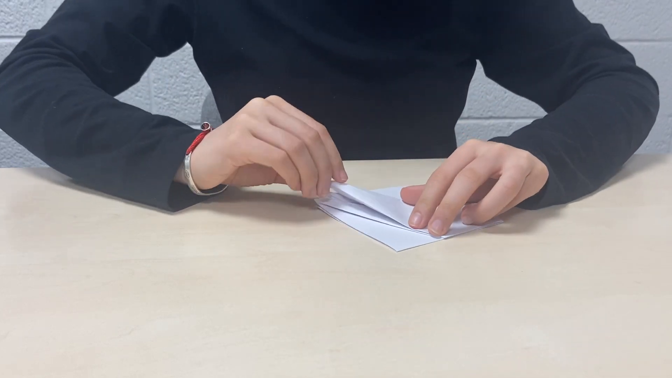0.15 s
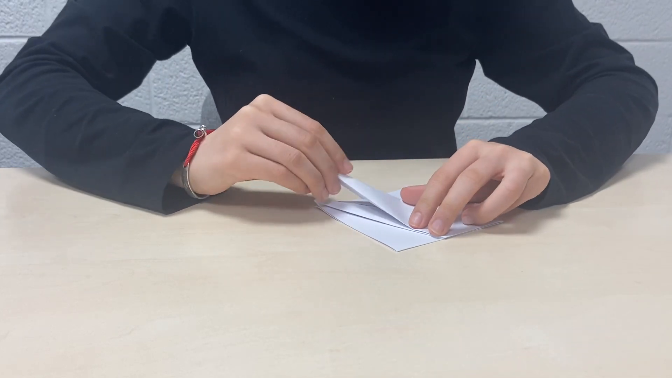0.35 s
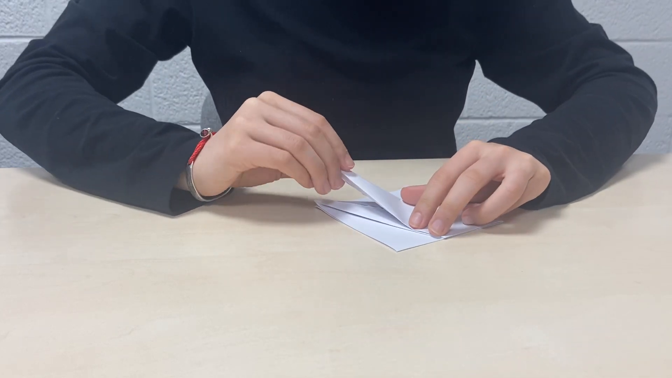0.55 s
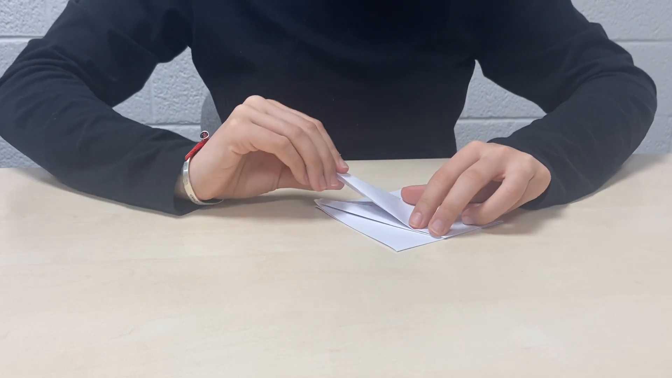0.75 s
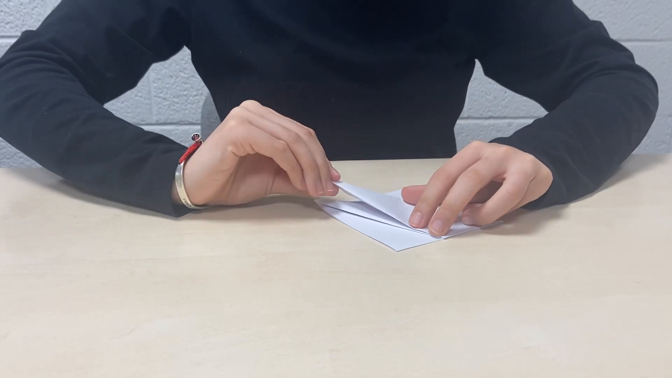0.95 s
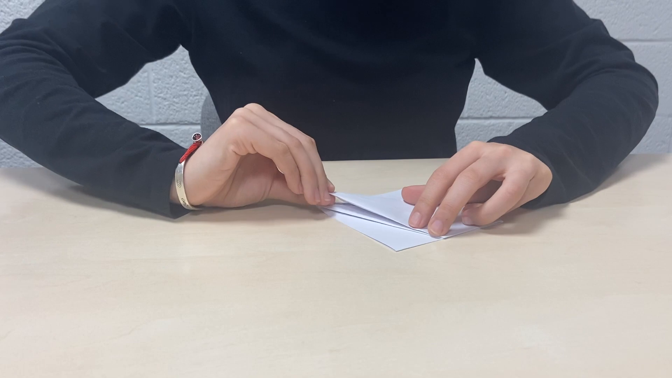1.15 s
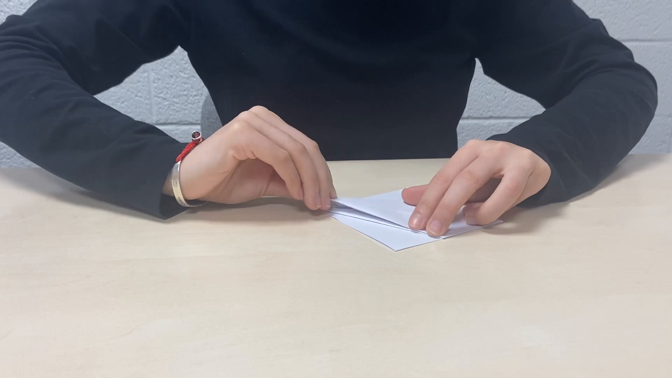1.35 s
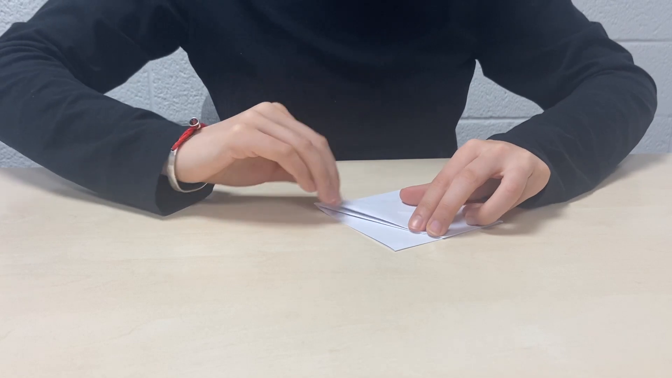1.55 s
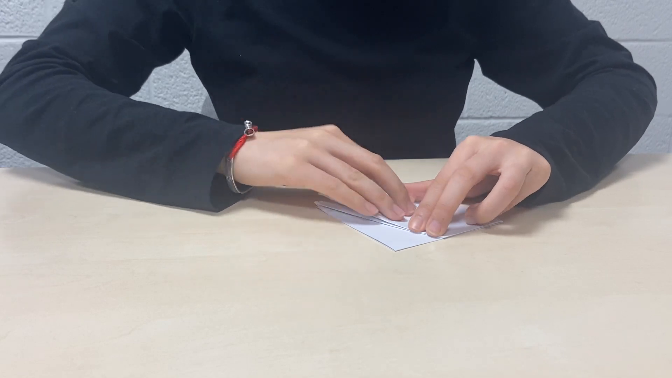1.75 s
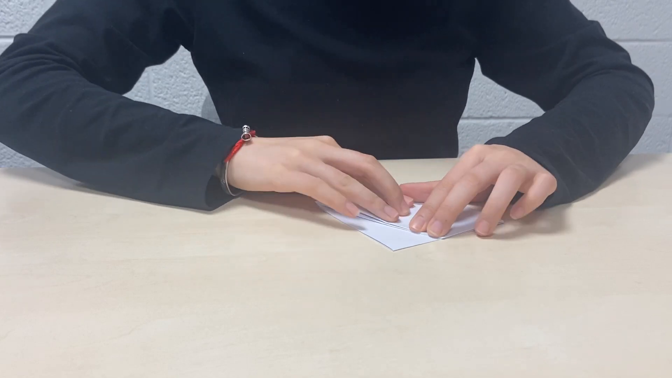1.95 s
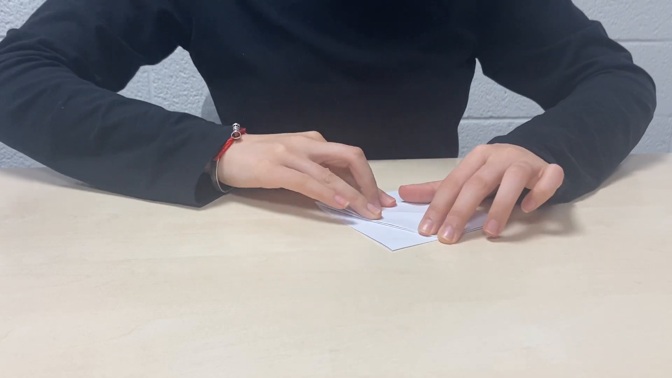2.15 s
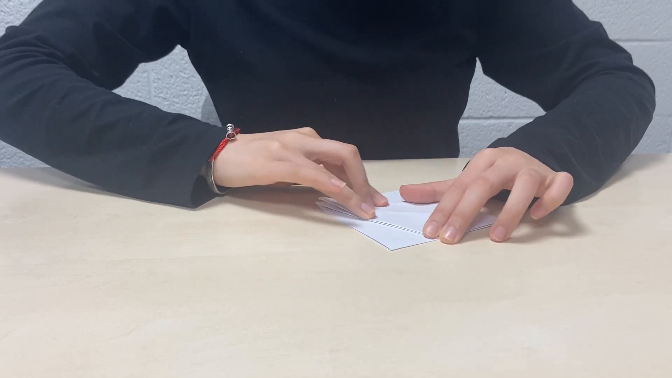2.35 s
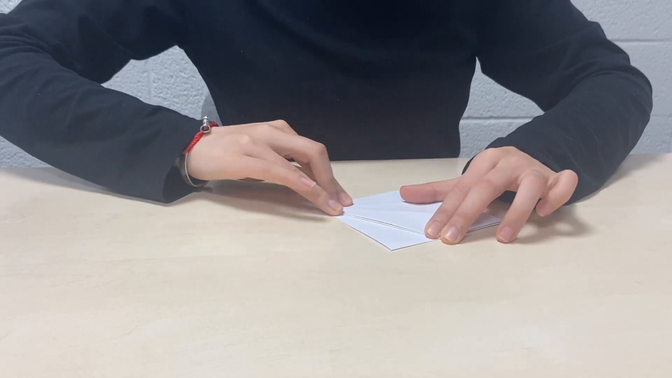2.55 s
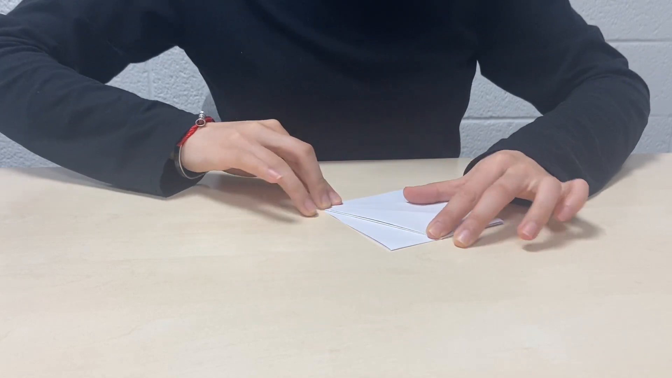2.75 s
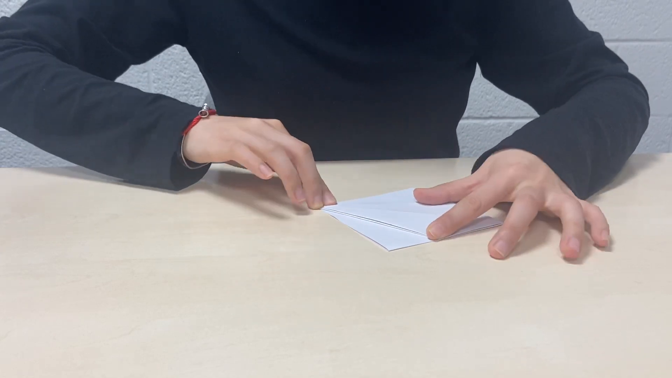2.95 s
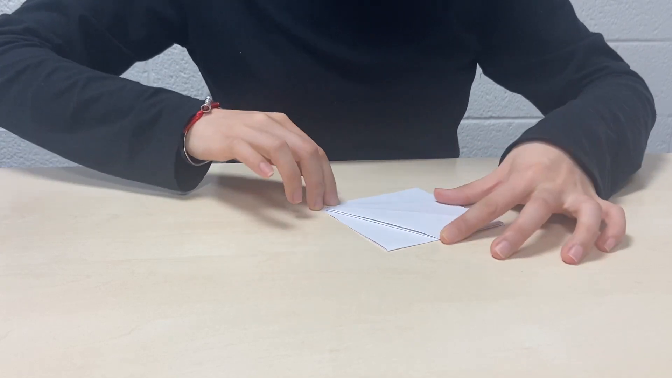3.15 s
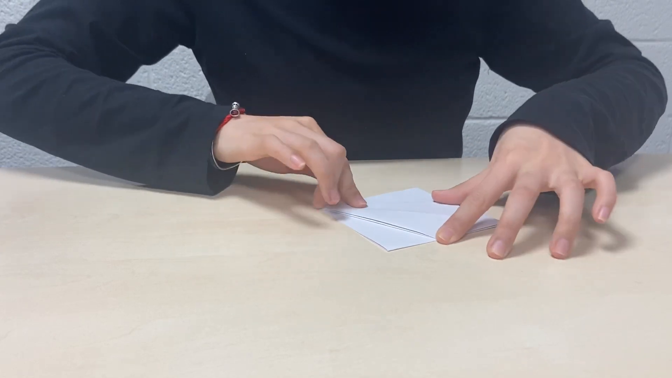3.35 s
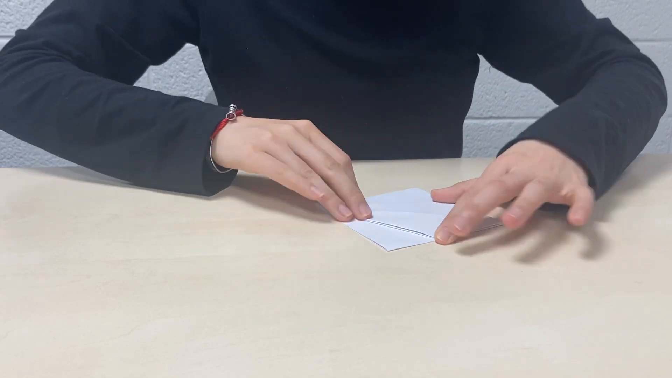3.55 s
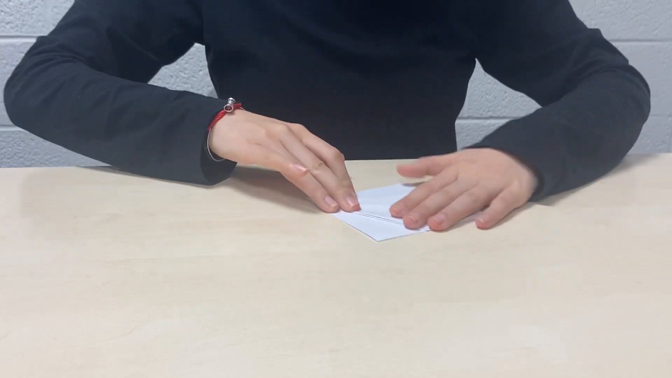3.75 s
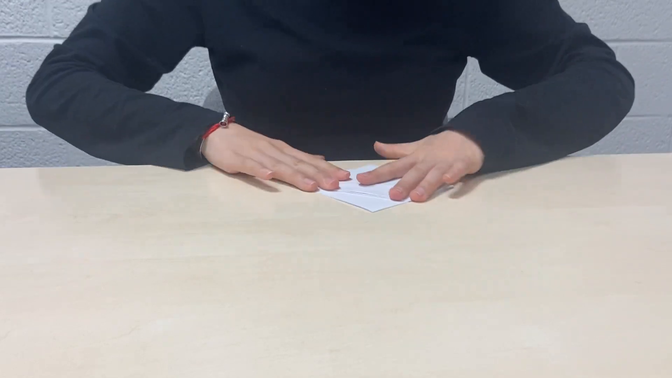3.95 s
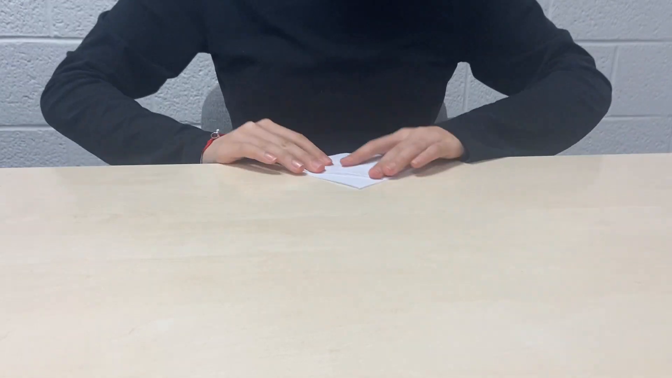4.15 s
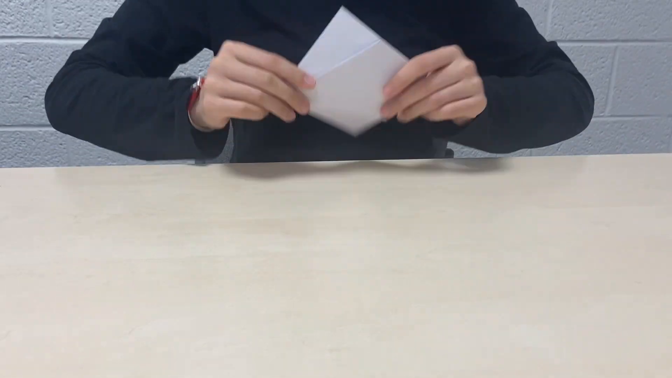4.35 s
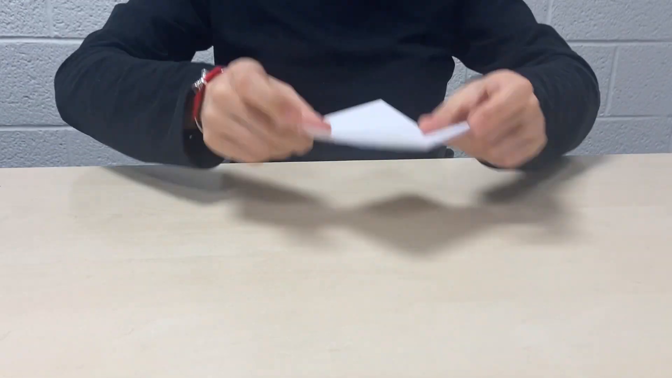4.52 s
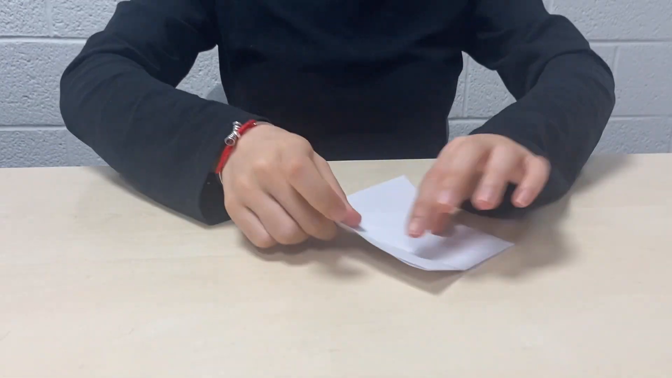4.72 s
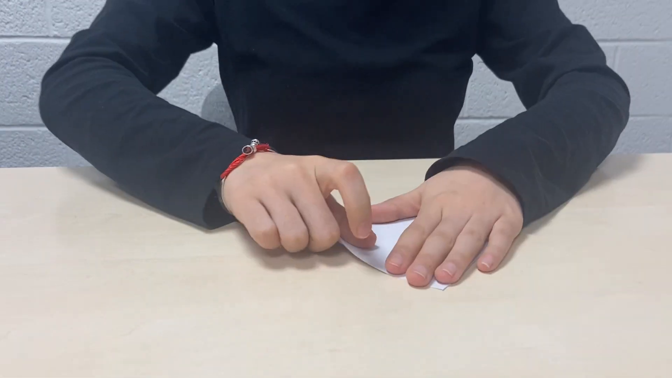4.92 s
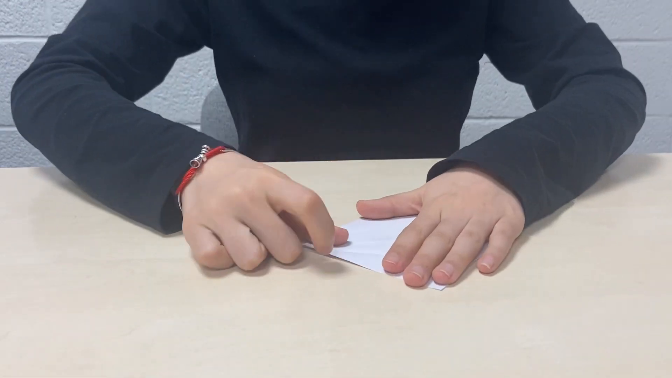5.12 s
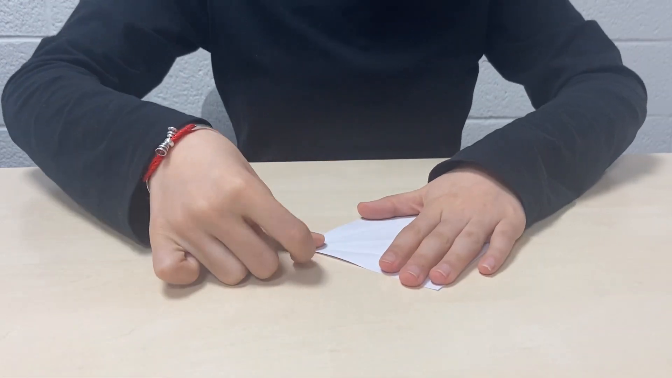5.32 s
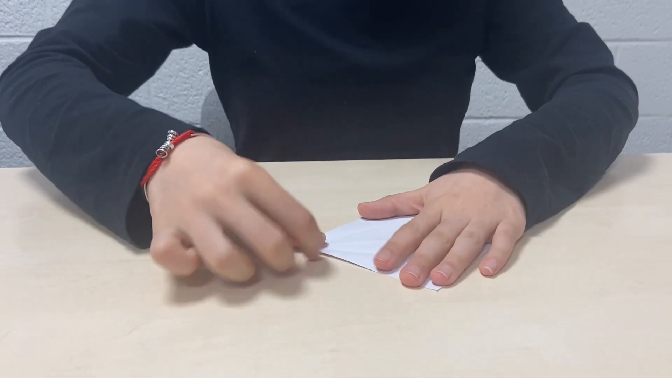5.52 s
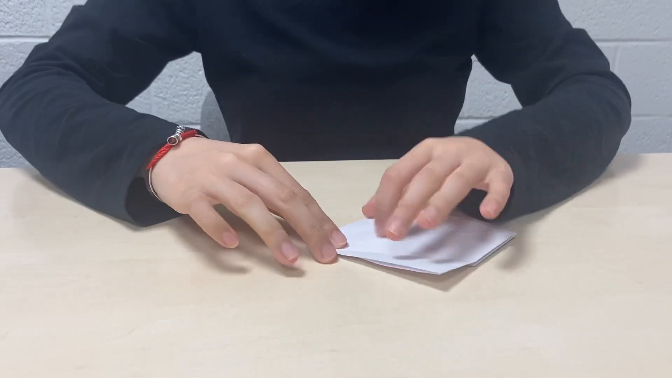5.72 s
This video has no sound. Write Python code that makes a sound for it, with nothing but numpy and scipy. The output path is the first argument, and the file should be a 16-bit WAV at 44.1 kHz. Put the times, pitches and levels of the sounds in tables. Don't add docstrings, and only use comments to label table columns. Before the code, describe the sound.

Close paper folding in a hard-walled room: crackling creases, hissing finger strokes, a brisk turn of the sheet, and dull palm thumps on the tabletop.

```python
import sys
import numpy as np
from scipy import signal
from scipy.fft import rfft, irfft, next_fast_len
from scipy.io import wavfile

SR = 44100
rng = np.random.default_rng(int(sys.argv[2]) if len(sys.argv) > 2 else 0)


def nominal_scale(level):
    x = np.asarray(level, float) / 20
    return 10 ** x


def dump_mix(stems):
    frames = np.atleast_2d(stems).T
    limited = np.clip(frames, -1, 1)
    pcm = np.round(limited * 32767).astype(np.int16)
    wavfile.write(sys.argv[1], SR, pcm)


N = 259300
SIZE = next_fast_len(N + SR)
HZ = np.maximum(np.arange(SIZE // 2 + 1) * SR / SIZE, 1)


def at_hz(points, hz):
    return np.interp(np.log(hz), np.log(np.array(points)[:, 0]), np.array(points)[:, 1])


def in_time(rows):
    s, value = np.transpose(rows)
    return np.interp(np.arange(N) / SR, s, value)


def rms_one(x):
    return x / np.sqrt(np.mean(x ** 2) + 1e-20)


def drift(rate):
    r = np.exp(-2 * np.pi * rate / SR)
    wander = signal.lfilter([1], [1, -2 * r, r * r], rng.standard_normal(N + SR))
    return rms_one(wander[SR:])


def colour(x, spectrum):
    return rms_one(irfft(rfft(x, SIZE) * nominal_scale(at_hz(spectrum, HZ)), SIZE)[:, :N])


def ring(x, hz, width_hz):
    r = np.exp(-np.pi * width_hz / SR)
    poles = [1, -2 * r * np.cos(2 * np.pi * hz / SR), r * r]
    return signal.lfilter(np.array([1, 0, -1]) * (1 - r * r) / 2, poles, x)


def background():
    # time in seconds, level in dB.
    rumble_level = [(0.0, -58.5), (1.46, -59), (1.75, -58.5), (1.98, -57), (2.11, -58.5), (3.27, -56.5),
                    (3.5, -55.5), (3.96, -54), (4.14, -53.5), (4.29, -57.5), (4.42, -52.5), (4.7, -59.5),
                    (5.04, -53), (5.37, -60), (5.6, -56), (5.88, -55.5)]
    # frequency in Hz, density in dB per Hz.
    air_spectrum = [(18, -51.5), (30, -4), (59, 1.5), (112, 3), (163, -8.5), (213, -5), (275, -14.5),
                    (342, -12.5), (495, -26.5), (640, -24.5), (830, -72), (1410, -120)]
    # frequency in Hz, density in dB per Hz.
    hiss_spectrum = [(600, 3), (1500, -0.5), (3500, -8), (8000, -15.5), (16000, -24)]
    unsteady = nominal_scale(in_time(rumble_level) + 1.44 * drift(24))
    rumble = unsteady * colour(rng.standard_normal((2, N)), air_spectrum)
    hiss = nominal_scale(-84) * colour(rng.standard_normal((2, N)), hiss_spectrum)
    return rumble + hiss


def thumps():
    # time in seconds, peak in dB, tilt in dB per octave.
    hits = [(0.163, -50, 7), (2.425, -41, -2.5), (2.552, -50, 5), (2.88, -48, 5), (3.341, -40.5, -7),
            (3.639, -37.5, -6), (3.987, -28.5, 0.5), (4.202, -45, -16.5), (4.283, -38, 3.5),
            (4.899, -28.5, 0), (4.955, -36.5, 7), (5.703, -34.5, -6)]
    # frequency in Hz, level in dB, t60 in seconds.
    modes = [(59, -3, 0.61), (85.7, -9.5, 0.28), (108.3, -2, 0.28), (126.5, -7.5, 0.81),
             (168.3, -7.5, 0.43), (242.6, -10.5, 0.11)]
    start_s, peak_db, tilt_db = np.transpose(hits)
    at = np.round(start_s * SR).astype(int)
    spread_db = rng.normal(0, 4.2, (len(hits), len(modes)))
    out = np.zeros(N)
    for k, (hz, level_db, t60) in enumerate(modes):
        push = np.full(N, 1e-18)
        tilt = tilt_db * np.log2(hz / 100)
        push[at] = nominal_scale(peak_db + level_db - 8.5 + tilt + spread_db[:, k])
        r, w = nominal_scale(-60 / (t60 * SR)), 2 * np.pi * hz / SR
        mode = signal.lfilter([0, np.sin(w)], [1, -2 * r * np.cos(w), r * r], push)
        out += mode * (-1) ** k
    soft = signal.butter(2, 350, fs=SR, output="sos")
    return signal.sosfilt(soft, out) * [[1], [.2]]


def pocket(rows, rise_s, bend):
    out, t = np.zeros((2, N + SR)), np.arange(SR // 2) / SR
    for s, level_db, first_hz, last_hz, t60, width in rows:
        blur = signal.butter(2, np.clip(width, .02, .3) * last_hz, fs=SR, output="sos")
        sway = signal.sosfilt(blur, rng.standard_normal((2, 2, len(t))))
        glide_hz = last_hz + (first_hz - last_hz) * np.exp(-t / 0.057)
        phase = 2 * np.pi * np.cumsum(glide_hz) / SR
        note = rms_one(sway[0] * np.cos(phase) + sway[1] * np.sin(phase))
        at = round(s * SR)
        fade = nominal_scale(level_db - 60 * (t / t60) ** bend)
        out[:, at:at + len(t)] += note * fade * np.clip(t / rise_s, 0, 1)
    return out[:, :N]


def rubbed_pocket():
    # start in seconds, level in dB, first Hz, last Hz, t60 in seconds, width as share of the note.
    hums = [(.18, -67.5, 3020, 2720, 0.24, 0.11), (.58, -69, 2900, 2890, 0.15, 0.088),
            (.81, -65.5, 2040, 1880, 0.33, 0.075), (.84, -73, 3440, 3460, 0.17, .05),
            (.87, -63, 658, 616, 0.24, .1), (1.29, -68, 2100, 1940, 0.28, .1),
            (1.77, -62, 6120, 6250, 0.19, 0.11), (2.79, -63, 841, 845, 0.44, 0.12),
            (2.8, -71, 1786, 2106, 0.44, 0.2), (4.405, -59, 7600, 6420, .4, 0.13),
            (4.892, -56, 1758, 1600, 0.11, .1), (4.9, -52.5, 5250, 4930, 0.12, 0.14),
            (5.26, -68, 787, 804, .24, 0.28)]
    return pocket(hums, rise_s=.015, bend=2)


def flicked_pocket():
    # start in seconds, level in dB, first Hz, last Hz, t60 in seconds, width as share of the note.
    flicks = [(0.33, -60, 1443, 1376, 0.34, 0.071), (.33, -45.5, 3470, 3500, 0.08, .1),
              (.778, -57, 2464, 2160, 0.33, 0.065), (.778, -63, 4420, 4480, 0.066, 0.11),
              (0.787, -56, 1694, 1630, 0.52, 0.074), (1.049, -72, 1640, 1610, 0.54, 0.1),
              (1.04, -82.5, 3440, 3310, 0.51, 0.041), (1.269, -47.5, 2470, 2140, 0.15, 0.14),
              (2.505, -49, 1738, 1675, 0.37, 0.11), (2.5, -51, 2600, 2520, 0.094, 0.059),
              (4.445, -67, 1896, 1844, 1, 0.15), (4.735, -40.5, 4920, 4700, 0.13, 0.039),
              (5.3, -65, 697, 700, 0.56, 0.052)]
    return pocket(flicks, rise_s=0.00081, bend=0.89)


def friction(spectrum, grains_per_s, grain_db, flutter_db):
    born = rng.random(N) < grains_per_s * nominal_scale(5 * drift(25)) / SR
    slips = rms_one(born * nominal_scale(5.8 * np.minimum(rng.exponential(1, N), 4)))
    flutter = nominal_scale(flutter_db * (drift(14) + drift(60)))
    rough = flutter * (1 + nominal_scale(grain_db) * slips)
    return colour(rough * rng.standard_normal((2, N)), spectrum)


def strokes(s, swell_s, level_db, fade_s):
    t = np.arange(0, N + 32, 32)[:, None] / SR - s
    away = np.maximum(-t / np.maximum(swell_s, .002), t / np.maximum(fade_s, .005))
    below = away ** 1.012
    gain = np.sqrt(np.sum(nominal_scale(level_db - 30 * np.minimum(below, 5)) ** 2, axis=1))
    return np.interp(np.arange(N) / 32, np.arange(len(gain)), gain)


def sliding_speed():
    # fastest moment in seconds, swell in seconds, hiss in dB, fade in seconds.
    fingertips = [(.03, 0.18, -62.5, 0.052), (.168, 0.13, -60, 0.2), (.235, 0.12, -60.5, 0.054),
                  (0.335, 0.0099, -57, 0.025), (.36, .01, -76, 1), (0.583, 0.016, -61, 0.096),
                  (.635, .08, -70.5, 0.043), (.785, 0.0078, -68, 0.073), (.93, 0.085, -70.5, 0.077),
                  (1.151, 0.012, -68, 0.0097), (1.2, 0.1, -72.5, 0.37), (1.272, 0.1, -69, 0.29),
                  (1.414, 0.073, -64.5, 0.18), (1.583, 0.12, -58.5, 0.067), (1.642, 0.052, -60, .08),
                  (1.77, .004, -60.5, 0.34), (1.888, 0.029, -48.5, 0.092), (2.084, 0.061, -54.5, 0.2),
                  (2.364, 0.0031, -62, 0.052), (2.422, 0.032, -55.5, 0.14), (2.546, 0.2, -60.5, 0.26),
                  (2.746, 0.0053, -71, 0.03), (2.853, 0.2, -69.5, 0.11), (2.912, .012, -70, 0.24),
                  (3.06, 0.23, -72.5, 0.11), (3.17, 0.049, -63.5, 0.19), (3.25, 0.031, -59, 0.033),
                  (3.327, 0.0096, -68, 0.021), (3.497, 0.027, -45.5, 0.056), (3.53, .012, -71, 1),
                  (3.695, 0.05, -63.5, 0.038), (4.67, .02, -54, .06), (4.895, 0.029, -58, 0.62),
                  (5.127, 0.22, -58.5, 0.043), (5.146, 0.0066, -54, 0.017), (5.35, 0.45, -69, 0.05),
                  (5.582, 0.051, -67.5, 0.91), (5.708, 0.15, -56, 0.23), (5.88, 0.076, -61, 0.1)]
    # time in seconds, level in dB.
    drag_level = [(3.73, -68), (3.75, -56), (3.95, -53.5), (4.19, -58), (4.36, -56.5), (4.4, -63),
                  (4.5, -59.5), (4.55, -56), (4.575, -69), (4.61, -58), (4.7, -57.5), (4.82, -53),
                  (4.9, -76)]
    t = np.arange(N) / SR
    moving = (t > drag_level[0][0]) & (t < drag_level[-1][0])
    dragging = nominal_scale(in_time(drag_level)) * moving
    return np.hypot(strokes(*np.transpose(fingertips)), dragging)


def rustle():
    # frequency in Hz, density in dB per Hz.
    slide_spectrum = [(500, -31), (1500, -13.5), (3000, 3.5), (5000, 4.5), (7000, 5.5), (10000, 6.5),
                      (13000, 4.5), (15800, 5.5), (16100, -18)]
    flex_spectrum = [(500, -5), (1000, -2), (1300, 2.5), (1800, 0.5), (2500, -1.5), (3500, -3),
                     (6000, -15.5), (12000, -43)]
    press_spectrum = [(150, 0.5), (350, 5), (600, -1), (1000, -10), (1500, -23.5), (4000, -41)]
    # strongest moment in seconds, swell in seconds, flexing in dB, pressing in dB, fade in seconds.
    bends = [(0.045, 0.017, -57.5, -67, 0.15), (.172, 0.38, -63.5, -70, 0.26),
             (.336, 0.011, -53.5, -56.5, 0.12), (.4, .1, -67, -79, 0.21),
             (0.579, 0.016, -60.5, -61, 0.11), (0.781, 0.0085, -57.5, -50.5, 0.15),
             (0.916, 0.2, -70, -61, 0.14), (1.155, 0.009, -81, -71, 0.14),
             (1.276, 0.0099, -57.5, -55.5, 0.12), (1.4, 0.72, -81, -69.5, 0.31),
             (1.583, 0.0067, -55, -70, 0.13), (1.888, 0.17, -56, -63.5, 0.15),
             (2.081, 0.041, -58, -57, 0.14), (2.37, 0.013, -71.5, -57, 0.063),
             (2.411, 0.015, -57, -51.5, 0.18), (2.498, 0.043, -49.5, -50.5, 0.11),
             (2.589, 0.21, -62, -62, 0.16), (2.777, 0.028, -70.5, -50, 0.33),
             (2.911, 0.054, -66.5, -49, 0.15), (3.167, 0.029, -70, -59.5, 0.16),
             (3.323, 0.01, -64.5, -65, 0.087),
             (3.751, 0.059, -55.5, -57.5, 0.2), (3.993, 0.041, -78, -59.5, 0.45),
               (4.291, 0.025, -74, -51, 0.34), (4.36, 0.49, -62, -63, 0.11),
               (4.731, 0.016, -43.5, -45.5, 0.19), (4.907, 0.063, -51.5, -53.5, 0.2),
               (5.146, 0.096, -60, -60, 0.13), (5.34, 0.19, -70, -63, 0.11),
               (5.58, 0.015, -70, -67.5, 0.19), (5.71, 0.077, -54, -62, 0.17),
               (5.88, 0.094, -67, -73, 0.12)]
    s, swell_s, flex_db, press_db, fade_s = np.transpose(bends)
    sliding = sliding_speed()
    bent_by_sliding = nominal_scale(-13.5) * sliding
    flexing = np.hypot(strokes(s, swell_s, flex_db, fade_s), bent_by_sliding)
    pressing = strokes(s, swell_s, press_db, fade_s)
    slide = sliding * friction(slide_spectrum, 900, grain_db=-11, flutter_db=1.5)
    flex = flexing * friction(flex_spectrum, 360, grain_db=-10, flutter_db=2.1)
    press = pressing * friction(press_spectrum, 120, grain_db=-11, flutter_db=1.2)
    return slide + flex + press


def pops():
    # start in seconds, peak in dB, note in Hz, t60 in seconds.
    facet_pops = [(.005, -47.5, 1500, 0.0068), (0.0385, -30, 2870, 0.0098), (0.0387, -34.5, 1640, 0.015),
                  (.038, -39.5, 6700, 0.016), (.172, -46, 3040, .012), (.173, -65, 1500, .012),
                  (0.329, -37.5, 2700, 0.02), (.441, -49.5, 2860, 0.021), (.776, -41, 2170, 0.044),
                  (.776, -45, 2575, 0.11), (0.783, -46, 2400, 0.022), (0.787, -47.5, 484, 0.17),
                  (.864, -51.5, 2460, 0.025), (1.147, -54.5, 1300, 0.016), (1.217, -58, 900, 0.021),
                  (1.31, -56, 4800, 0.013), (1.394, -60, 7040, .012), (1.492, -66, 1600, 0.013),
                  (1.593, -36.5, 2810, 0.012), (1.593, -47, 1040, 0.028), (1.702, -61, 1310, 0.012),
                  (1.794, -49, 2960, 0.0078), (1.803, -47, 1480, 0.0071), (1.83, -45, 3840, .01),
                  (1.863, -50, 2500, 0.004), (1.9, -39.5, 3870, 0.011), (1.913, -61, 1500, .012),
                  (1.931, -48, 3830, .012), (2.103, -55, 1800, .012), (2.207, -65, 1400, 0.013),
                  (2.407, -38, 3120, 0.014), (2.407, -51, 770, 0.035), (2.427, -45, 3370, .01),
                  (2.48, -23.5, 2630, 0.0073), (2.48, -31.5, 3680, 0.0094), (2.4805, -33.5, 1730, 0.04),
                  (2.486, -39, 1340, 0.014), (2.491, -30, 2940, .01), (2.49, -39, 3850, 0.0087),
                  (2.496, -35, 2540, 0.025), (2.496, -35, 1550, 0.014), (2.497, -39, 1020, 0.12),
                  (2.738, -59, 1990, 0.013), (2.785, -50, 840, 0.052), (2.81, -44.5, 617, 0.064),
                  (2.858, -48, 820, 0.049), (2.858, -60, 3100, .012), (2.906, -47, 820, 0.07),
                  (2.913, -62, 2000, 0.018),
                  (3.217, -55, 3020, 0.0084), (3.566, -57.5, 2320, .015), (3.578, -61, 2000, 0.015),
                 (3.617, -53, 7360, 0.0074), (3.774, -33.5, 2400, 0.0093), (3.777, -33.5, 1600, 0.011),
                 (3.856, -42, 2980, 0.0075), (4.315, -48, 2000, .01), (4.322, -39, 1010, 0.02),
                 (4.335, -42, 1180, .01), (4.337, -48, 4600, 0.0087), (4.344, -45, 3160, .01),
                 (4.344, -41, 1820, .01), (4.355, -42, 1710, .01), (4.357, -54, 3400, .008),
                 (4.363, -39.5, 695, 0.014), (4.375, -46, 1100, 0.0083), (4.417, -59, 2100, .012),
                 (4.433, -37, 1970, 0.012), (4.437, -41, 460, 0.026), (4.448, -53.5, 1890, .012),
                 (4.51, -54, 1790, .012), (4.552, -47.5, 1650, 0.017), (4.561, -45.5, 600, 0.0092),
                 (4.721, -52, 3400, .01), (4.7279, -23.5, 3680, 0.0061), (4.7275, -26, 7600, 0.0063),
                 (4.729, -30.5, 2860, 0.014), (4.729, -31.5, 1170, .025), (4.736, -34.5, 2160, .04),
                 (4.898, -41, 1900, .015), (4.902, -38.5, 280, 0.088), (4.905, -32.5, 3230, 0.026),
                 (4.905, -25.5, 4640, 0.0042), (4.908, -40, 1750, 0.04), (5.144, -41, 4800, 0.012),
                 (5.145, -49.5, 3000, .01), (5.144, -54, 6600, 0.0093), (5.707, -39, 4500, 0.01),
                 (5.708, -42, 2490, 0.0075), (5.717, -44, 1390, .012), (5.868, -54, 3800, 0.012),
                 (5.871, -52, 995, 0.014)]
    edge_spits = [
        (0.0368, -40, 11400, .007),
        (.3276, -34.5, 11000, 0.006),
        (.3276, -31, 15200, .006),
        (0.331, -48, 6600, .006),
        (.796, -66, 11100, .006),
        (1.051, -66, 6500, 0.0047),
        (1.146, -64, 12000, 0.009),
        (2.496, -50, 11200, .006),
        (4.898, -50, 11200, .01),
        (4.7268, -32, 14900, .007),
    ]
    out, t = np.zeros((2, N + 4096)), np.arange(4096) / SR
    rise = np.clip(t / 0.00017, 0, 1)
    click = 1 + 1.1 * np.exp(-t / .0004)
    for s, peak_db, hz, t60 in [*facet_pops, *edge_spits]:
        shape = nominal_scale(peak_db - 60 * t / np.maximum(t60, .003)) * rise * click
        phase = 2 * np.pi * hz * t
        at = round(s * SR)
        out[:, at:at + 4096] += shape * [np.sin(phase), 1.03 * np.cos(phase)]
    return out[:, :N]


def buckles():
    # start in seconds, peak in dB, ring in Hz, bright crack in dB, low flap in dB.
    sharp = [(0.0385, -40, 1030, 16, 6.5), (0.0646, -45, 1310, -21, -25), (0.3269, -40.5, 1280, 14.5, 8.5),
             (1.9, -40, 1450, -18.5, -9), (2.407, -47, 796, 20.5, 6.5), (2.427, -43, 1110, -39, -24),
             (2.4845, -31, 1100, -9, -16), (4.319, -57, 970, -22, -22), (4.356, -47, 1670, -26, -30.5),
             (4.721, -46, 2200, 17.5, -15), (4.727, -29.5, 2200, 16.5, 2.5), (4.905, -30, 1700, 7.5, -29),
             (5.136, -39, 2070, 18, 1), (5.707, -38.5, 1340, 17.5, -4.5)]
    ragged = [(.33, -38.5, 940, -27, 5.5), (0.777, -50, 2400, -9, 7.5), (1.27, -42, 2320, -5, -1.5),
              (1.592, -50, 2660, 11, -31), (1.838, -41, 2240, -2, 1.5), (2.48, -38, 2050, -3, 3.5),
              (3.753, -48, 1050, -12, 9.5), (3.777, -32.5, 1170, -27, -3), (4.415, -43.5, 1583, -24, -15.5),
              (4.433, -39, 1640, 3, -4.5), (4.535, -59, 703, -23, 3), (4.574, -56.5, 1300, -8.5, 1),
              (4.89, -45.5, 1840, 13, -20)]
    # start in seconds, peak in dB, ring in Hz.
    ticks = [(.437, -55.5, 2680), (1.051, -68.5, 1490), (1.393, -58, 1990), (1.584, -50, 3530),
             (1.764, -53, 3500), (2.177, -58.5, 3730), (3.243, -52, 2640), (3.32, -52.5, 1840),
             (3.472, -48.5, 3000), (3.497, -64, 4150), (3.599, -48, 2820), (4.2, -47, 2480),
             (5.574, -61, 4200), (5.652, -54.5, 3330), (5.678, -50, 2490)]
    pats = [
        (.504, -63.5, 1100),
        (1.146, -65, 1075),
        (2.363, -67.5, 1690),
        (2.738, -61.5, 960),
        (2.772, -62, 950),
        (2.857, -59.5, 935),
        (2.904, -54, 900),
        (3.162, -72, 1200),
        (4.344, -55, 977),
    ]
    crinkles = [(.577, -53, 3040), (.865, -55, 1590), (1.701, -65, 1300), (2.059, -47, 3260),
                (2.075, -51, 1500), (2.81, -53.5, 1040), (3.563, -60, 2240), (3.614, -58.5, 1020),
                (3.693, -51, 2700), (3.854, -64, 3200), (4.312, -44, 780), (4.373, -48, 1230),
                (4.403, -45.5, 1010), (4.554, -53.5, 940), (5.16, -49.5, 1220), (5.859, -50, 3750)]
    rows = [(*row, .008) for row in sharp]
    rows += [(*row, 0.0095) for row in ragged]
    for small, crack_db, flap_db in [(ticks, 10.5, -11), (pats, -27.5, 10.5), (crinkles, -7.5, -6.5)]:
        rows += [(*row, crack_db, flap_db, 0.017) for row in small]
    return rows


def snaps():
    out, t = np.zeros((2, N + 4096)), np.arange(4096) / SR
    bright = signal.butter(2, 4000, "high", fs=SR, output="sos")
    for s, peak_db, hz, crack_db, flap_db, t60 in buckles():
        burst = rng.standard_normal((2, 4096)) ** 3
        burst *= nominal_scale(-60 * t / np.clip(t60, .003, .12))
        burst *= 1 - np.exp(-t / .0002)
        burst[:, 9] += 8.8
        facets = ring(burst, hz, .5 * hz)
        facets = facets - .6 * ring(burst, 1.6 * hz, .5 * hz) + .6 * ring(burst, .6 * hz, .4 * hz)
        facets = ring(facets, hz, 2.8 * hz)
        crack = signal.sosfilt(bright, burst) + 0.93 * ring(burst, 4000, 5700)
        flap = ring(burst, 650, 490)
        parts = [(facets, 0), (crack, crack_db), (flap, flap_db)]
        at = round(s * SR)
        out[:, at:at + 4096] += sum(nominal_scale(peak_db + db) * x / np.abs(x[0]).max() for x, db in parts)
    return out[:, :N]


def room(x):
    # frequency in Hz, t60 in seconds.
    decay = [(200, 0.93), (1000, 0.031), (3000, 0.14), (8000, 0.25), (16000, 0.13)]
    t, tail = np.arange(SR // 2) / SR, 0
    edges = np.geomspace(150, 18000, 8)
    for low, high in zip(edges, edges[1:]):
        band_pass = signal.butter(2, [low, high], "band", fs=SR, output="sos")
        band = signal.sosfilt(band_pass, rng.standard_normal((2, len(t))))
        tail = tail + band * nominal_scale(-60 * t / at_hz(decay, np.sqrt(low * high)))
    tail = tail * np.clip((t - .004) / 0.0011, 0, 1)
    tail = tail / np.sqrt(np.sum(tail ** 2) / 2)
    return nominal_scale(-12) * irfft(rfft(x, SIZE) * rfft(tail, SIZE), SIZE)[:, :N]


def scene():
    # frequency in Hz, likeness from 0 to 1.
    likeness = [(60, .97), (140, .9), (330, .55), (700, .15), (1300, .2), (2500, .65), (4500, .65),
                (5700, .3), (7000, .97), (8500, .995), (16000, .995)]
    cracks = snaps() + nominal_scale(-3.0) * pops()
    direct = cracks * nominal_scale([[0], [-1.5]])
    paper = direct + room(cracks) + rustle() + flicked_pocket() + rubbed_pocket()
    mid, side = rfft(paper + thumps() + background(), SIZE)
    alike = np.clip(at_hz(likeness, HZ), 0, 1)
    pair = np.sqrt((1 + alike) / 2) * mid + np.sqrt((1 - alike) / 2) * side * [[1], [-1]]
    return irfft(pair * nominal_scale([[1.8], [1.3]]), SIZE)[:, :N]


def band_limit(x):
    return signal.sosfilt(signal.butter(12, 16970, fs=SR, output="sos"), x)


def record(dry):
    # frequency in Hz, lead in turns.
    port_lead = [(0, 0), (5300, -.1), (7000, 0), (9000, .5), (11250, 1), (13350, 1.5), (15500, 2)]
    turns = np.interp(HZ, *np.transpose(port_lead))
    shift = np.exp(1j * np.pi * turns * [[-1], [1]])
    ports = irfft(rfft(dry, SIZE) * shift, SIZE)[:, :N]
    bottom = signal.butter(2, 30, "high", fs=SR, output="sos")
    top = signal.cheby2(10, 60, 17150, fs=SR, output="sos")
    return band_limit(signal.sosfilt(np.vstack([bottom, top]), ports))


dry = scene()
out = record(dry)
dump_mix(out)
```